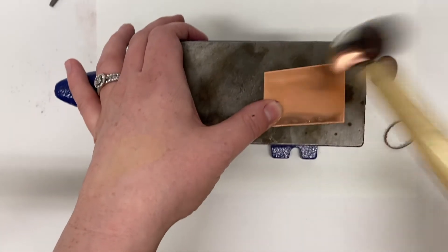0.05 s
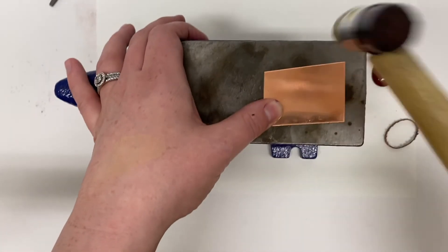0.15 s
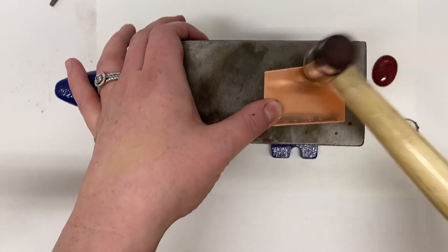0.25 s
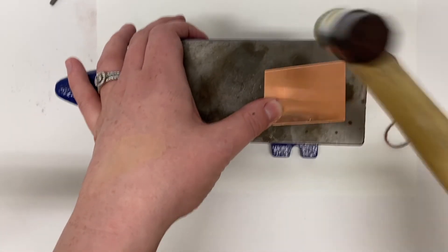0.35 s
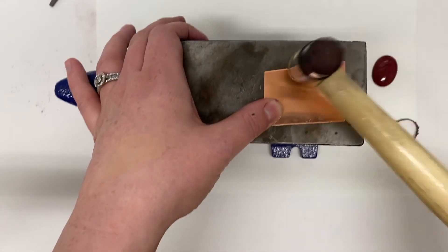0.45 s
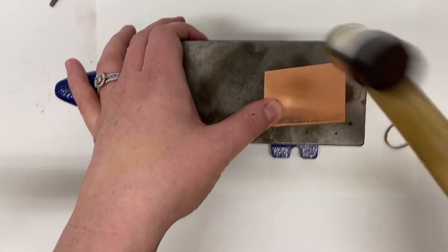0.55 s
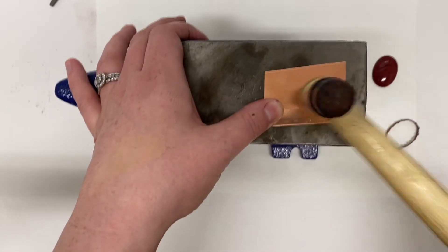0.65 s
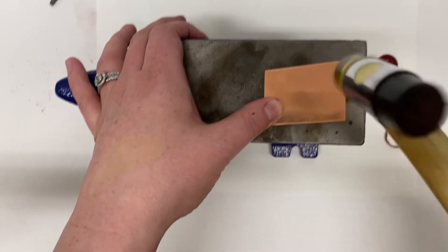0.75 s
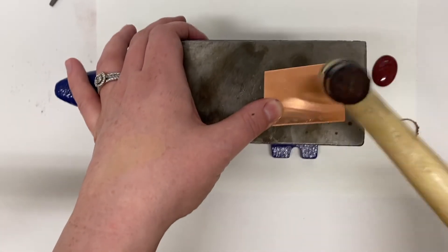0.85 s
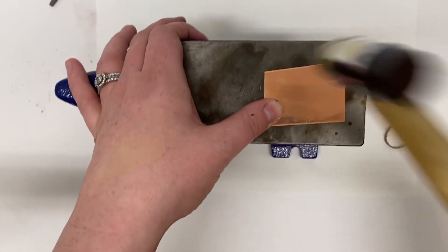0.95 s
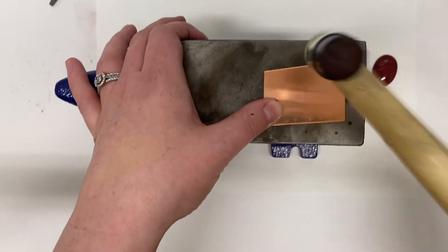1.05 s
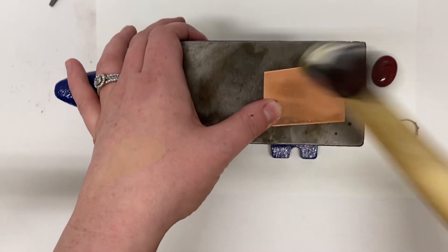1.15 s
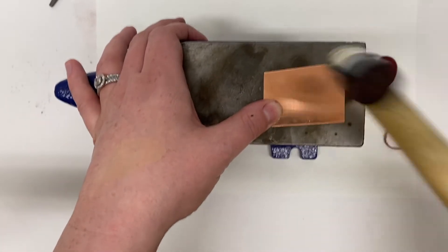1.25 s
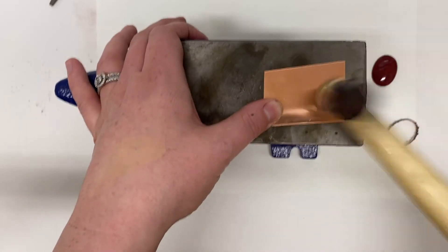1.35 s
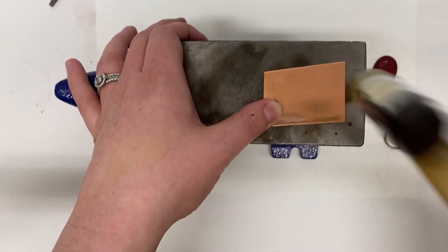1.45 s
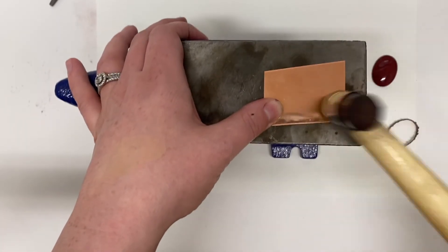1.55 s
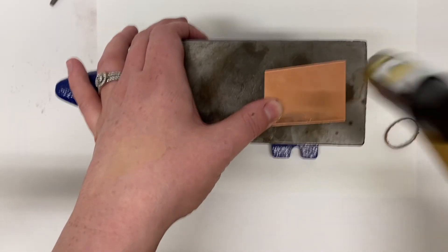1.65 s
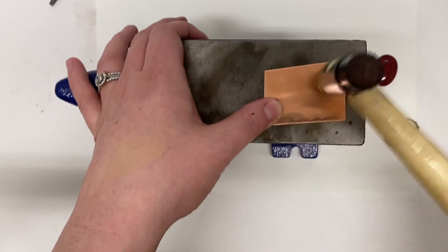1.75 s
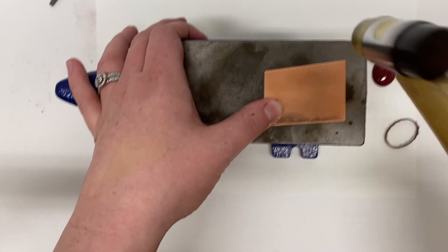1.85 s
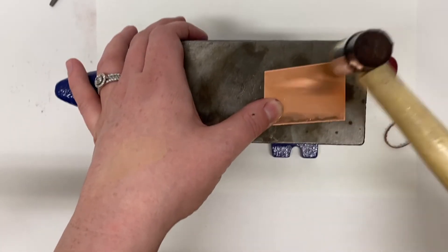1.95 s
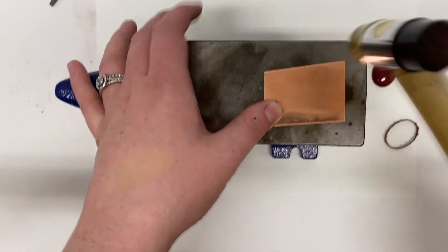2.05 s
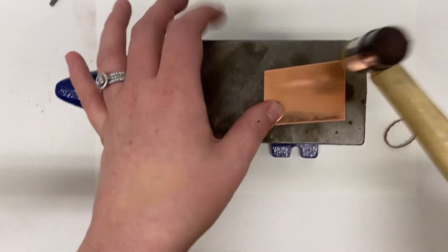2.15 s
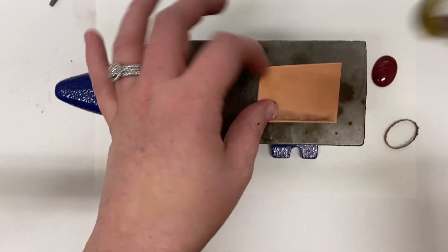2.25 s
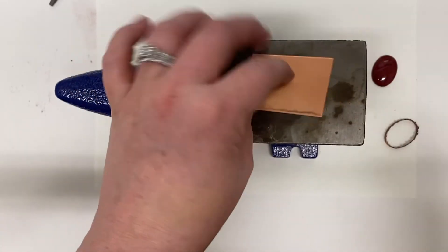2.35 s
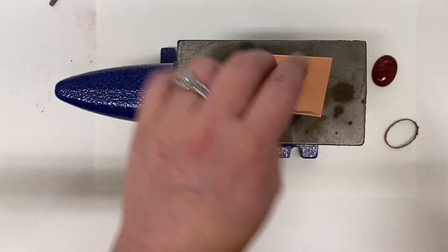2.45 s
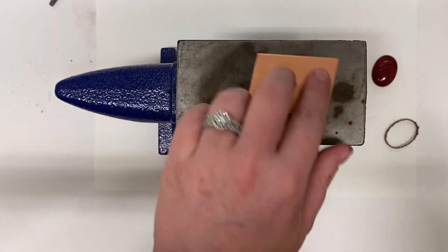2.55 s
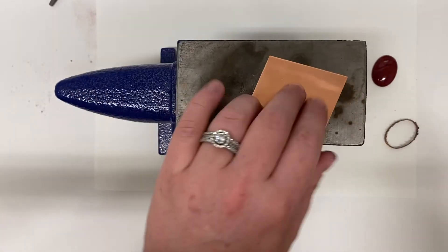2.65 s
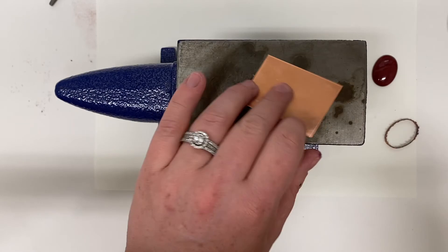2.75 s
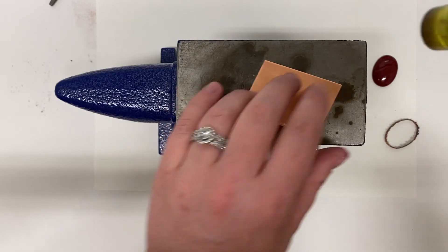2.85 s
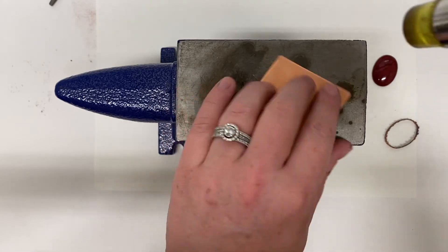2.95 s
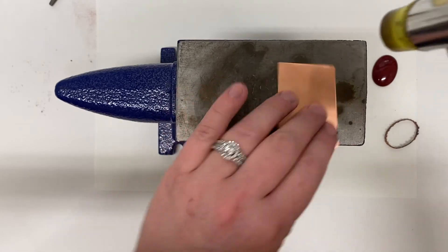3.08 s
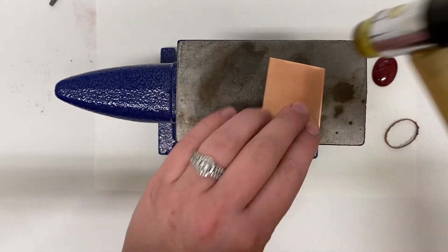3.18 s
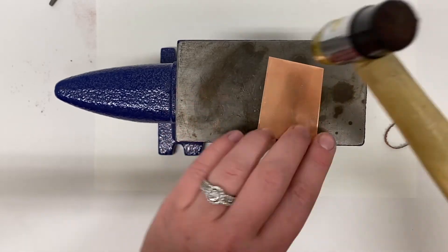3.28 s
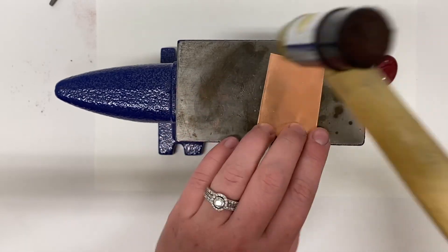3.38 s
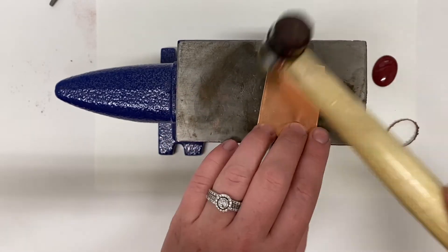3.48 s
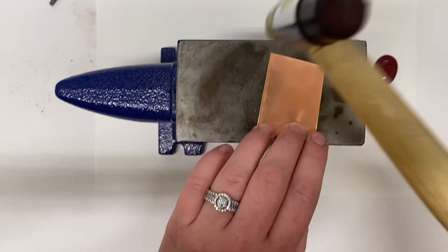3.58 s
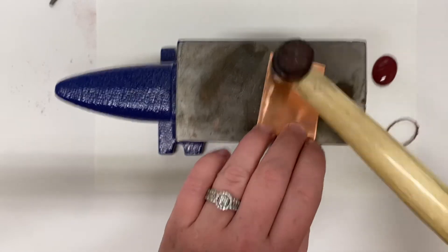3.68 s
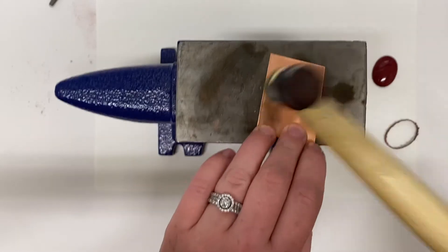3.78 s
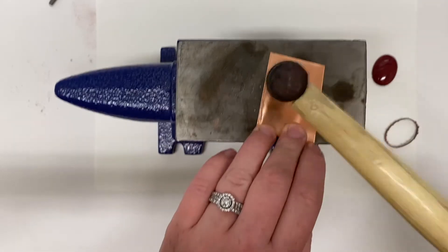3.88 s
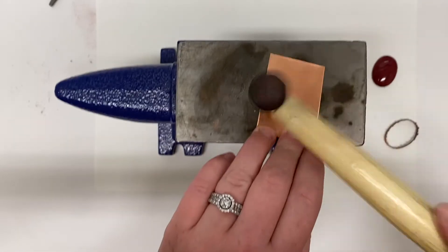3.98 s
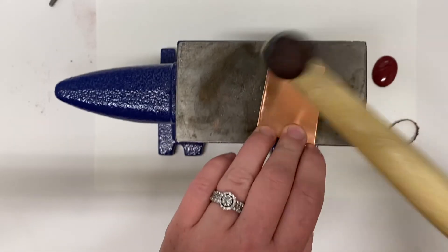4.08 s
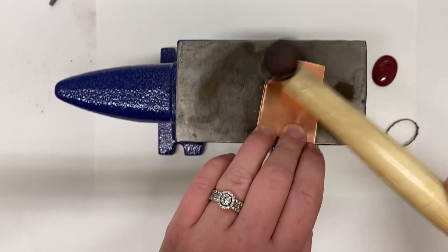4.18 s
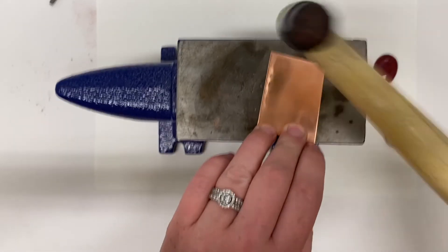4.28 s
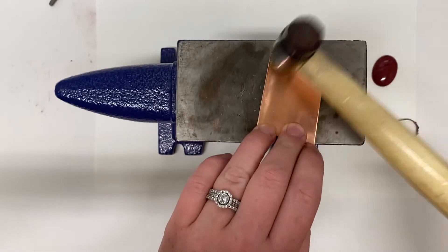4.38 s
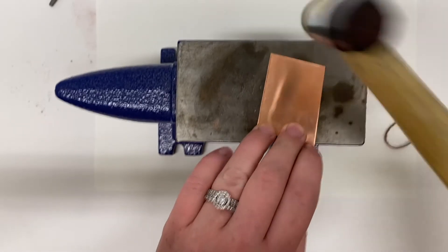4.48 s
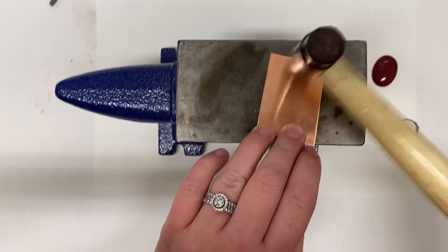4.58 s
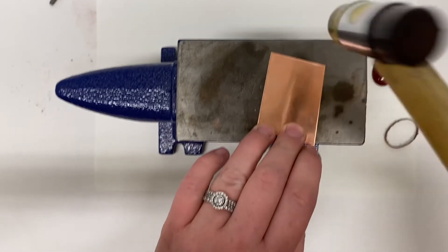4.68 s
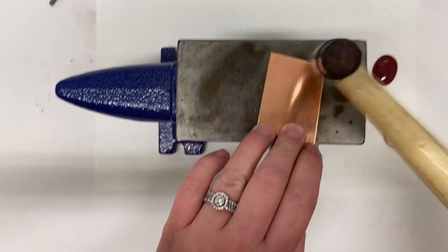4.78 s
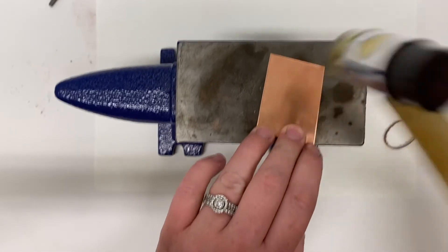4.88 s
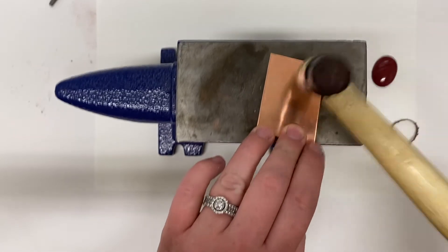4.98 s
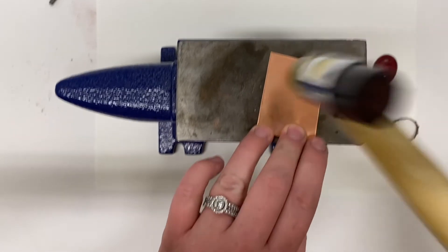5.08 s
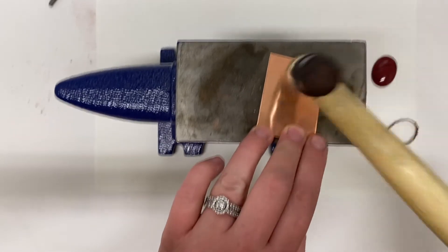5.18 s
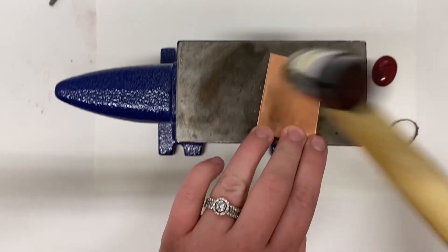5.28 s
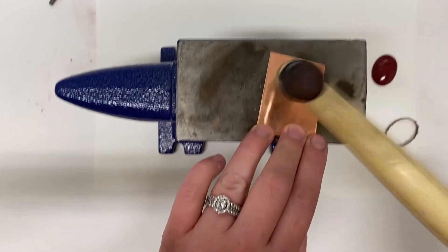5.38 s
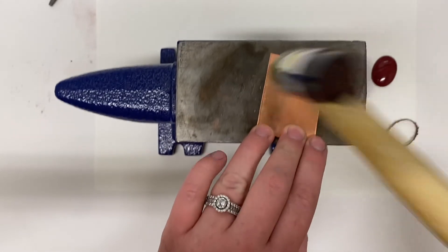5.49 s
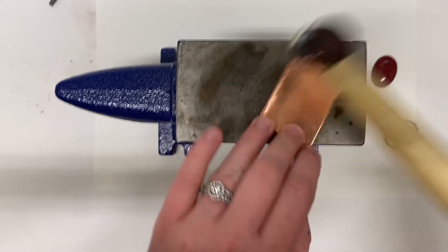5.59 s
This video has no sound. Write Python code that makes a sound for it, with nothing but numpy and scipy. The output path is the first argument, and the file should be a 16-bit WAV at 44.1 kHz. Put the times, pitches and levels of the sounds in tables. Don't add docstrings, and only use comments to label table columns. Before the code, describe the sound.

Close up in a small quiet room, a mallet strikes thin copper sheet on a small steel anvil, about five sharp clacks a second, each with a faint ring and a woody bench thud. After two seconds the blows stop; fingers turn the sheet with soft scrapes, ticks and a thin high singing. Then hammering resumes at the same quick pace until the end.

```python
import sys
import numpy as np
from scipy import signal
from scipy.fft import rfft, irfft, next_fast_len
from scipy.io import wavfile
from scipy.ndimage import uniform_filter1d

SR = 44100
rng = np.random.default_rng(int(sys.argv[2]) if len(sys.argv) > 2 else 0)


def to_linear_factor(level_db):
    exponent = np.asarray(level_db, float) / 20
    return 10 ** exponent


def log_audio(samples):
    frames = np.atleast_2d(samples).T
    limited = np.clip(frames, -1, 1)
    pcm = np.round(limited * 32767).astype(np.int16)
    wavfile.write(sys.argv[1], SR, pcm)


N = 248279
LEAD = 12000

# f/Hz, level/dB, T60/s
SHEET_MODES = [(2760, -1, 0.2), (3330, 1.5, 0.027), (2990, -5.5, 0.21), (3520, 1, .25), (3930, 1, .22),
               (5540, 1, .22), (4100, -6.5, .1), (4300, -6, .12), (4800, -6, 0.32), (4750, -3.5, 0.061),
               (5800, -1.5, 0.11), (8800, -12, 0.047)]
# f/Hz, level/dB
RUB_COLOUR = [(800, -23), (2300, -6.5), (4800, -4.5), (7000, -8.5), (10000, -10.5), (13000, -16),
              (15600, -18), (16200, -59.5)]


def evened(x):
    return x / np.sqrt(np.mean(x ** 2) + 1e-20)


def read(points, hz, column=1):
    table = np.transpose(points)
    return np.interp(np.log(hz + 1), np.log(table[0] + 1), table[column])


def add(mix, s, sound):
    part = mix[..., LEAD + round(s * SR):][..., :sound.shape[-1]]
    part += sound[..., :part.shape[-1]]


def coloured(x, points):
    hz = np.fft.rfftfreq(x.shape[-1], 1 / SR)
    return irfft(rfft(x) * to_linear_factor(read(points, hz)), x.shape[-1])


def peak(hz, centre_hz, width_hz, db):
    return to_linear_factor(db) / (1 + ((hz - centre_hz) / width_hz) ** 2)


def ringing(modes, seconds, phases, rise_cycles):
    t = np.arange(round(seconds * SR))[:, None] / SR
    hz, db, t60 = np.transpose(modes)
    fall = to_linear_factor(db - 60 * t / t60)
    rise = 1 - np.exp(-(t * hz / rise_cycles) ** 2)
    return (fall * rise * np.sin(2 * np.pi * hz * t + phases)).sum(-1)


def clack(db, upper_hz, lower_hz, treble_db, noise, phases):
    # f/Hz, level/dB
    chatter = [(800, -18.5), (1200, -15), (2100, -5.5), (4200, -1), (6500, -2.5), (8600, 3.5), (9200, -5.5),
               (12500, -10), (15500, -15), (16500, -30.5), (17000, -63)]
    # f/Hz, level/dB
    steel = [(1950, -6.5), (2720, 2), (3370, 0), (3900, -14), (8600, -7)]
    tones_db = -10
    t = np.arange(-256, 768) / SR
    hz = np.fft.rfftfreq(len(t), 1 / SR)
    tones = steel + [(upper_hz, 7.0), (upper_hz * 1.1, -1.5), (lower_hz, 1.5)]
    sines = sum(to_linear_factor(g) * np.sin(2 * np.pi * (f * t + p)) for (f, g), p in zip(tones, phases))
    source = rfft(noise) * to_linear_factor(read(chatter, hz))
    source = source + to_linear_factor(tones_db) * rfft(sines * signal.windows.tukey(len(t), .3))
    source = source * to_linear_factor(np.interp(hz, [6000, 7500], [0, treble_db + 17.5]))
    bands = np.geomspace(1500, 14000, 5)
    out = 0
    for k, centre in enumerate(bands):
        share = np.interp(np.log(hz + 1), np.log(bands), np.arange(5) == k)
        hold_s = np.interp(centre, [5000, 9000], [.0035, .0012])
        clamp_db_per_s = -11000 * (centre / 5000) ** -.6
        fall = to_linear_factor(clamp_db_per_s * np.clip(t - hold_s, 0, None) - 900 * t)
        shape = np.clip(t / .0004, 0, 1) * fall
        out = out + shape * irfft(source * share, len(t))
    return to_linear_factor(db) * 0.97 * out / np.sqrt(np.max(uniform_filter1d(out ** 2, 88)))


def struck(modes, chance, spread_db, rise_cycles, phases):
    hz, db, t60 = np.transpose(modes)
    detuned = hz * (1 + 0.0075 * chance[0, :len(hz)])
    varied = np.transpose([detuned, db + spread_db * chance[1, :len(hz)], t60])
    return ringing(varied, .45, phases, rise_cycles)


def shimmer(db, upper_hz, lower_hz, treble_db, fizz, noise):
    # f/Hz, level/dB, T60/s
    after_ring = [(28, -29, .5), (50, 0.5, 0.84), (87, 8, 1), (162, 5.5, 0.15), (456, 8.5, .33),
                  (850, -2.5, 0.26), (1319, -10, 0.54), (2330, -13, 0.5), (2800, -4.5, 0.58),
                  (3500, -8.5, 0.46), (5100, -12, 0.48), (6300, -9.5, 0.53), (9000, -13, .4),
                  (12500, -18.5, 0.63), (15560, -24, .2), (16000, -58.5, .2)]
    hz, t, z = signal.stft(noise, SR, nperseg=512)
    bands = 1 + peak(hz, upper_hz, 240, 2.1) + peak(hz, lower_hz, 300, -7.0)
    bands = bands + peak(hz, 4000, 200, 1.1) + peak(hz, 3300, 200, 8.7) + peak(hz, 4890, 170, 7.5)
    dulling_db = .3 * (treble_db + 16)
    treble = [0, dulling_db, dulling_db, 6.0 * fizz - 15.5]
    bands = bands * to_linear_factor(np.interp(hz, [6000, 8000, 12000, 13200], treble))
    fade = to_linear_factor(-60 * t / read(after_ring, hz, column=2)[:, None]) + to_linear_factor(6.5 - 60 * t / 0.13)
    tail = signal.istft(z * fade * (bands * to_linear_factor(read(after_ring, hz)))[:, None], SR, nperseg=512)[1]
    swell = np.clip((np.arange(tail.shape[1]) / SR - .0025) / 0.0055, 0, 1)
    return to_linear_factor(db - 24) * tail * swell


def blows():
    # t/s, force level/dB, upper clack f/Hz, lower clack f/Hz, treble level/dB
    strikes = [(0.0429, -22.5, 5400, 3753, -18), (0.2316, -23.5, 5325, 3410, -19.5),
               (0.417, -24, 5187, 3420, -16.5), (0.61, -24.5, 5150, 3527, -13),
               (0.7922, -24, 5284, 3500, -13), (0.9755, -24, 5520, 3520, -16),
               (1.162, -23.5, 5000, 3440, -16), (1.3438, -22.5, 5410, 3974, -16),
               (1.5288, -21.5, 5310, 3816, -13), (1.715, -24.5, 5280, 3906, -13),
               (1.9008, -23.5, 5190, 3560, -14), (2.0824, -24, 5460, 3787, -17),
               (3.4464, -26, 5510, 2996, -18), (3.6192, -23.5, 5500, 3150, -17.5),
               (3.7957, -23.5, 5110, 3250, -16.5), (3.9785, -22, 4864, 3070, -18.5),
               (4.1731, -22.5, 5325, 3326, -18), (4.358, -22.5, 5240, 3200, -17.5),
               (4.5478, -22, 5270, 3435, -15.5), (4.7397, -21, 5090, 2855, -14),
               (4.9293, -25, 5340, 3700, -12.5), (5.1248, -23.5, 5015, 3420, -15.5),
               (5.3177, -23.5, 5200, 3350, -18), (5.5122, -26, 5320, 2823, -17)]
    # t/s, level/dB, upper f/Hz, lower f/Hz, treble level/dB
    rebound = (4.0176, -20, 5000, 2900, -15)
    # f/Hz, level/dB, T60/s
    bench = [(154.4, -7.5, 0.12), (195.8, -2.5, .09), (252.6, -6.5, 0.12), (261.75, -8.5, 0.52),
             (320.6, 3.5, 0.059), (407, 6, 0.05), (428.2, -4.5, 0.11), (537.6, -1, 0.069),
             (604.4, 1, 0.069), (660, -6, 0.071), (664, -12.5, 0.17), (872, -12.5, .07), (925, -1.5, 0.038)]
    earlier_s = 0.11
    clack_db, usual_force_db = -8.0, -24
    clack_follows = 0.1
    forerunner_s, forerunner_db = .0078, -24
    spot_db, spot_t60_s = 2.5, .2
    glance_db_per_s = -3000
    before_s = 256 / SR

    clacks, thuds, tails = np.zeros(N + LEAD), np.zeros(N + LEAD), np.zeros((2, N + LEAD))
    rows = [(strikes[0][0] - earlier_s, *strikes[0][1:])] + list(strikes)
    shapes = (2, 1024), (2, 16), (2, 20000)
    draws = zip(*(rng.standard_normal((len(rows), *shape)) for shape in shapes))
    glance = to_linear_factor(glance_db_per_s * np.arange(-256, 768).clip(0) / SR)
    bench_hz = np.transpose(bench)[0]
    delay_s = .0032 * (bench_hz / 500) ** -.35
    crest = np.pi / 2 - 2 * np.pi * bench_hz * delay_s
    for (s, force_db, *colour), (grit, chance, scatter) in zip(rows, draws):
        db = clack_db + clack_follows * (force_db - usual_force_db)
        add(clacks, s - before_s, clack(db, *colour, grit[0], 3 * chance[0]))
        early_db = db + forerunner_db + 2.5 * chance[1, -1]
        early = clack(early_db, *colour, grit[1], 3 * chance[1])
        early = signal.lfilter(*signal.butter(2, 3800, fs=SR), early)
        add(clacks, s - before_s - forerunner_s, early * glance)
        sheet = SHEET_MODES + [(hz, spot_db, spot_t60_s) for hz in colour[:2]]
        ring = struck(sheet, chance[::-1], 3.0, 12.0, 9 * chance[0, :len(sheet)])
        add(clacks, s + .002, to_linear_factor(db - 37) * ring)
        add(thuds, s + .0004, to_linear_factor(force_db - 1.0) * struck(bench, chance, 1.4, 0.92, crest))
        add(tails, s, shimmer(db, *colour, chance[0, -1], scatter))
    bounce = clack(*rebound[1:], rng.standard_normal(1024), rng.random(16))
    add(clacks, rebound[0] - before_s, glance * bounce)
    return clacks, thuds, tails


def ticks():
    # t/s, level/dB, brightness f/Hz
    rattles = [(0.1594, -55, 3670), (0.3444, -41.5, 2800), (1.2936, -36, 5150), (2.4169, -53.5, 5770),
               (2.5807, -60, 2350), (2.6948, -57, 5040), (2.7759, -65.5, 2640), (2.796, -59.5, 2760),
               (2.8964, -60, 2650), (2.922, -64, 2540), (2.9966, -48, 5000), (3.0283, -55, 4900),
               (3.0693, -65, 4900), (3.094, -50, 4660), (3.2437, -73.5, 4930), (3.301, -55.5, 4150),
               (3.3617, -55.5, 900), (3.7319, -41.5, 5100), (4.025, -34, 4650), (4.6746, -41, 5740),
               (5.0585, -41, 3130)]
    out, t, hz = np.zeros(N + LEAD), np.arange(1024) / SR, np.fft.rfftfreq(1024, 1 / SR)
    for (s, db, centre_hz), noise in zip(rattles, rng.standard_normal((len(rattles), 1024))):
        burst = irfft(rfft(noise) * (to_linear_factor(read(RUB_COLOUR, hz)) + peak(hz, centre_hz, 700, 1.1)))
        shape = (1 - np.exp(-t / .0004)) * to_linear_factor(-60 * t / 0.021)
        add(out, s, to_linear_factor(db) * evened(burst) * shape)
    return out


def slide():
    # strongest t/s, swell t/s, fade t/s, level/dB
    pushes = [
        (2.3, .08, 0.079, -61.5),
        (2.42, 0.013, .06, -58.5),
        (2.58, .14, 0.065, -68.5),
        (2.72, .04, 0.067, -64.5),
        (2.8, .012, 0.049, -60),
        (2.92, 0.054, 0.19, -65.5),
        (3.0, 0.02, 0.12, -57.5),
        (3.099, 0.091, 0.1, -65),
        (3.3, .008, .03, -70),
    ]
    push_range_db = 23
    lift_s, drop_s, ease_s = 2.94, 3.2, 0.045
    sing_db = -33
    t = np.arange(-LEAD, N) / SR
    push = 0
    for s, swell, fade, db in pushes:
        push = push + to_linear_factor(db - push_range_db * np.maximum((s - t) / swell, (t - s) / fade))
    flutter = evened(uniform_filter1d(rng.standard_normal(len(t)), 90))
    grit = rng.standard_normal(len(t)) * to_linear_factor(5.0 * flutter)
    grit = evened(coloured(grit, RUB_COLOUR)) * push * to_linear_factor(-3.0)
    lifted = np.clip(np.minimum(t - lift_s, drop_s - t) / ease_s + .5, 0, 1)
    free_ring = ringing([(4900, -1, 0.25)], 0.23, 0, 0.66)
    held_ring = ringing([(2680, 4.3, 0.039)], 0.05, 0, 0.66)
    free = signal.oaconvolve(grit * lifted, free_ring)[:len(t)]
    held = signal.oaconvolve(grit * (1 - lifted), held_ring)[:len(t)]
    return grit + to_linear_factor(sing_db) * (free + held)


def room(x):
    # f/Hz, level/dB, T60/s
    walls = [(58.6, -6, 1), (248, -13.5, 0.15), (350, -18, 0.3), (520, -17, 0.62), (700, -14, 0.5),
             (940, -10.5, 0.45), (1500, -15, 0.34), (16000, -14, .22)]
    taps = np.zeros((2, SR))
    at = np.arange(0, SR - 12, 12) + rng.integers(0, 12, (2, (SR - 1) // 12))
    np.put_along_axis(taps, at, rng.choice([-1., 1.], at.shape), 1)
    hz, t, z = signal.stft(taps, SR, nperseg=256)
    fade = to_linear_factor(-60 * t / read(walls, hz, column=2)[:, None]) + to_linear_factor(-1.0 - 60 * t / 0.037)
    tail = signal.istft(z * fade * to_linear_factor(read(walls, hz) - 16.5)[:, None], SR, nperseg=256)[1]
    tail = tail * np.clip((np.arange(tail.shape[1]) / SR - .005) / 0.002, 0, 1)
    return signal.fftconvolve(x, tail, axes=1)[:, :x.shape[1]]


def air():
    # f/Hz, level/dB per Hz
    rumble = [(15, -28), (25, -4.5), (92, 11.5), (504, -8), (779, -27), (2140, -26), (2340, -22),
              (2950, -17), (3540, -20.5), (6000, -19.5), (7800, -57.5), (13200, -120)]
    # f/Hz, level/dB
    vent = [(470, -59), (503, 17), (535, -61)]
    hiss = [(7000, -25), (11000, -27.5), (15500, -45.5), (16200, -79.5)]
    noise = coloured(rng.standard_normal((2, N + LEAD)), rumble[:-2] + hiss)
    return to_linear_factor(-76 + 5.0) * evened(noise) + to_linear_factor(-89) * evened(coloured(noise, vent))


def ports(direct, scattered):
    # f/Hz, likeness/1
    likeness = [(100, 1), (300, 0.81), (600, 0.33), (1300, 0.67), (2000, 0.9), (2800, 0.75), (4200, 0.58),
                (5000, 1), (5600, 1)]
    # f/Hz, level/dB
    shading = [(100, -3), (400, -3), (900, -6), (1300, -4), (2200, -3), (2700, -10.5), (3100, -6.5),
               (3400, -5), (4300, -5.5), (5100, -2), (16000, 4.5)]
    # f/Hz, lead/half turns
    lead = [(0, 0), (500, -.07), (2200, .05), (3100, .28), (3700, .16), (5000, .1), (6000, .5), (7350, 1),
            (10400, 2), (13500, 3), (16300, 4), (22050, 6)]
    size = next_fast_len(N + LEAD + 4096)
    hz = np.fft.rfftfreq(size, 1 / SR)
    near = rfft(direct, size)
    other, far = rfft(scattered, size)
    same = np.clip(read(likeness, hz), 0, 1)
    left = near * to_linear_factor(read(shading, hz)) + same * far + np.sqrt(1 - same ** 2) * other
    turn = np.exp(1j * np.pi * np.interp(hz, *np.transpose(lead)))
    return irfft(np.array([left * turn, near + far]), size)[:, LEAD:LEAD + N]


def scene():
    clacks, thuds, tails = blows()
    loose = ticks() + slide()
    sheet = ringing(SHEET_MODES, .3, rng.uniform(0, 2 * np.pi, len(SHEET_MODES)), .6)
    loose = loose + to_linear_factor(-55.5) * signal.fftconvolve(loose, sheet)[:N + LEAD]
    return ports(clacks + thuds + loose, tails + room((thuds + loose)[None]) + air())


def roll_off(x):
    return signal.sosfilt(signal.butter(12, 17160, fs=SR, output="sos"), x)


def record(dry):
    ceiling, edge_hz = .85, 16700
    rounded = dry / (1 + abs(dry / ceiling) ** 4) ** (1 / 4)
    band_limit = signal.cheby2(10, 60, edge_hz + 500, fs=SR, output="sos")
    return roll_off(signal.sosfilt(band_limit, rounded))


dry = scene()
out = record(dry)
log_audio(out)
```